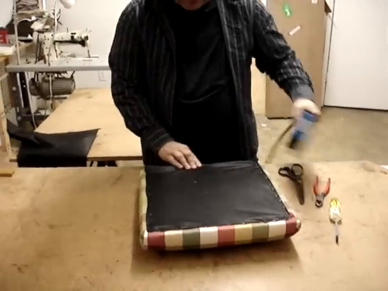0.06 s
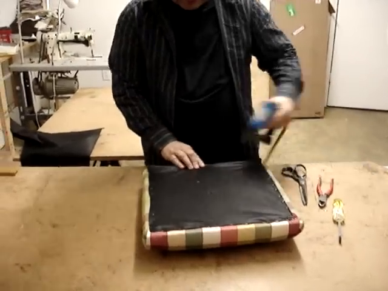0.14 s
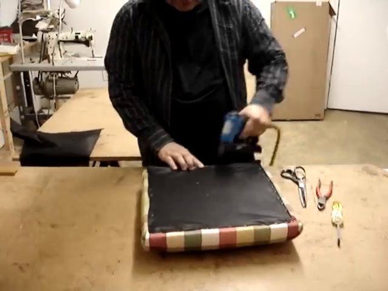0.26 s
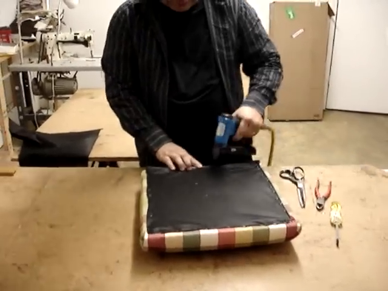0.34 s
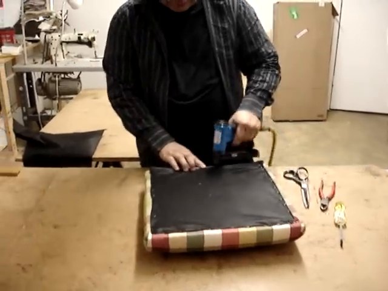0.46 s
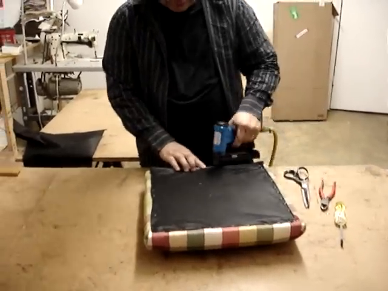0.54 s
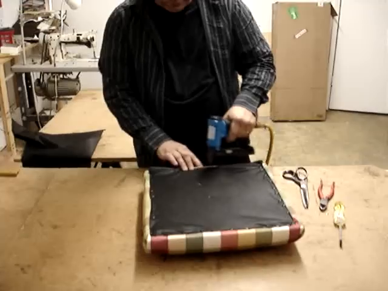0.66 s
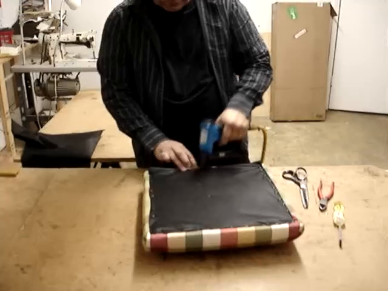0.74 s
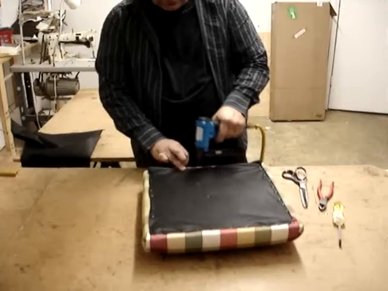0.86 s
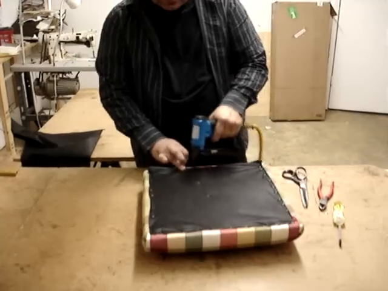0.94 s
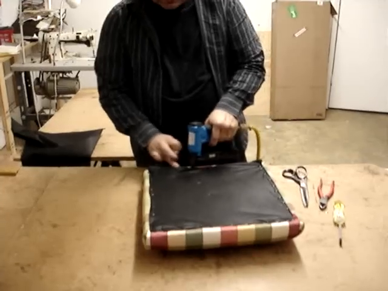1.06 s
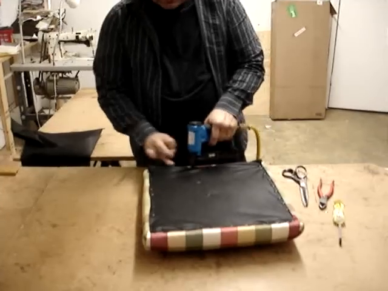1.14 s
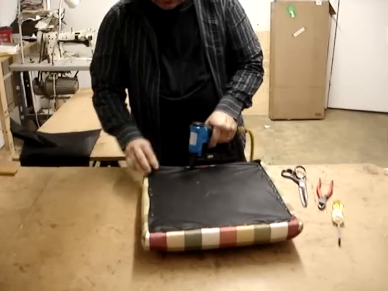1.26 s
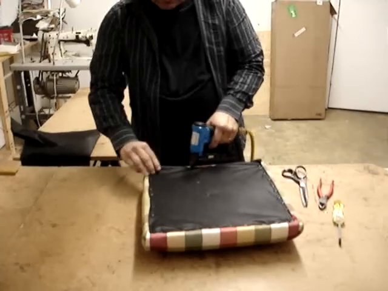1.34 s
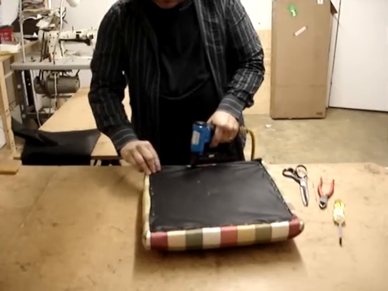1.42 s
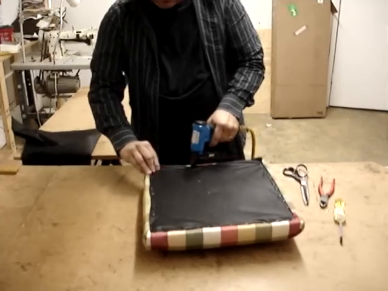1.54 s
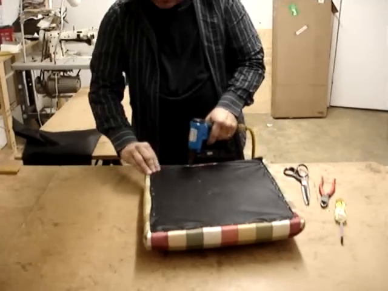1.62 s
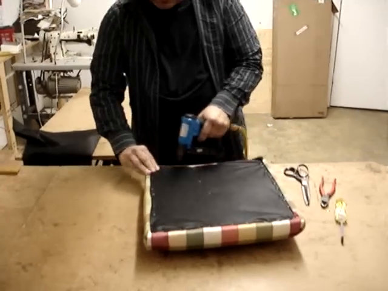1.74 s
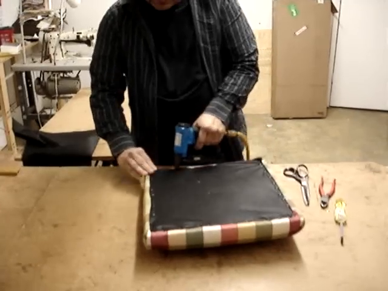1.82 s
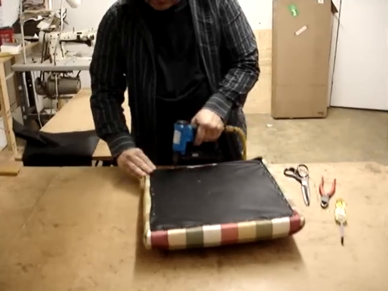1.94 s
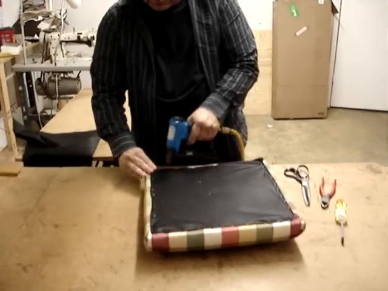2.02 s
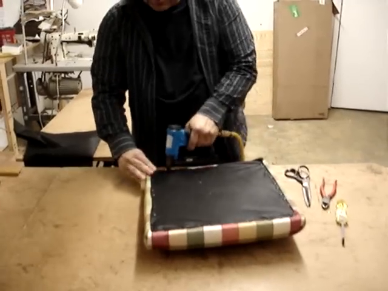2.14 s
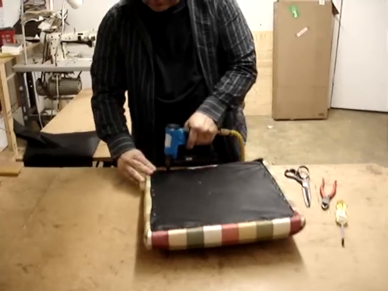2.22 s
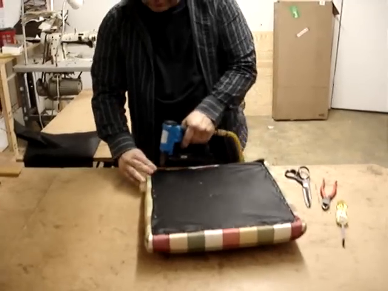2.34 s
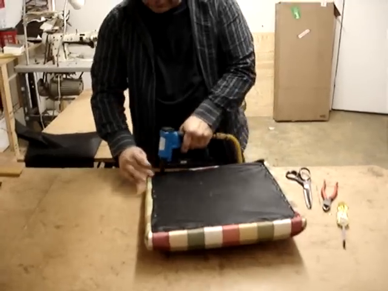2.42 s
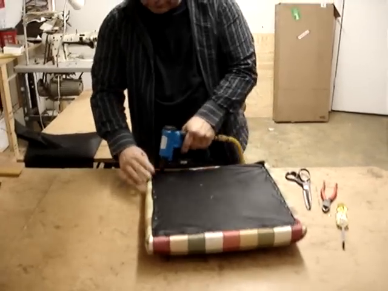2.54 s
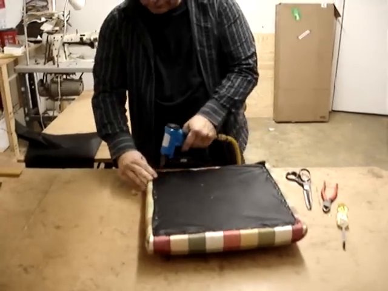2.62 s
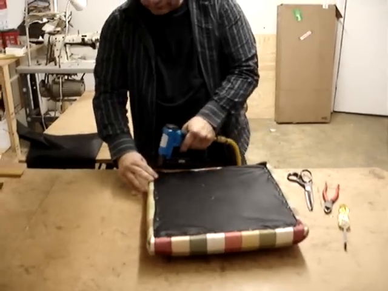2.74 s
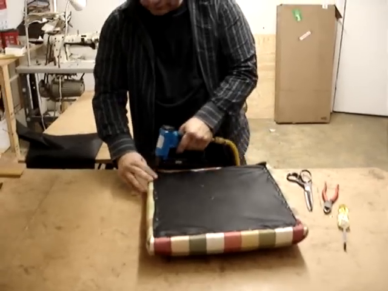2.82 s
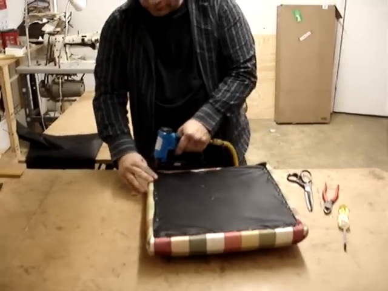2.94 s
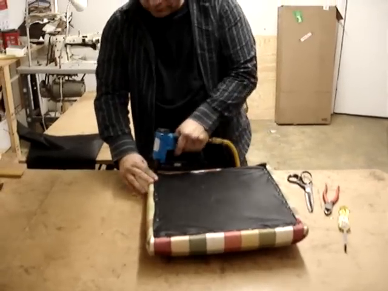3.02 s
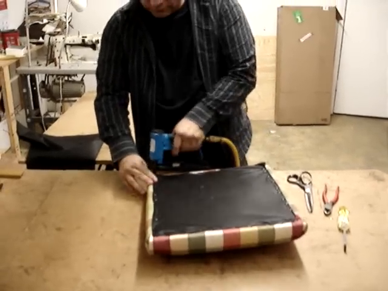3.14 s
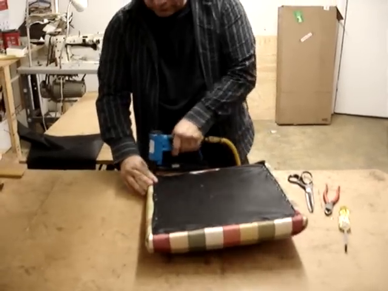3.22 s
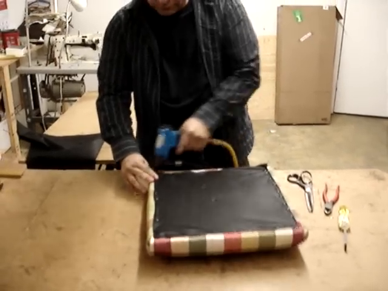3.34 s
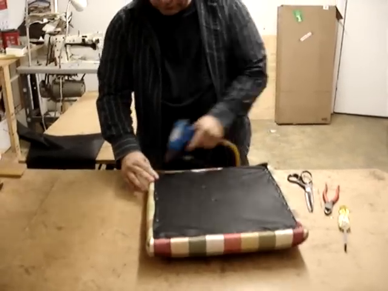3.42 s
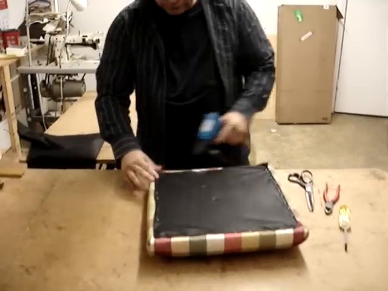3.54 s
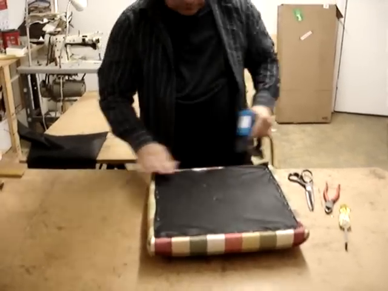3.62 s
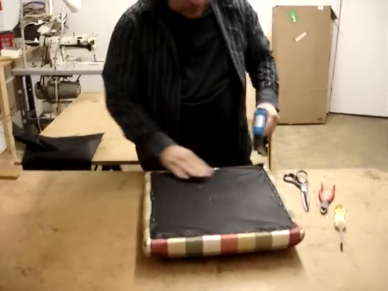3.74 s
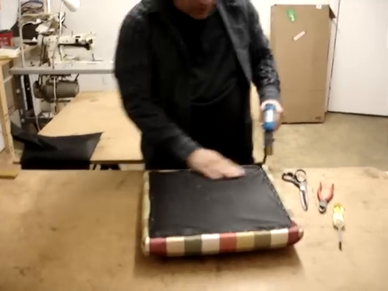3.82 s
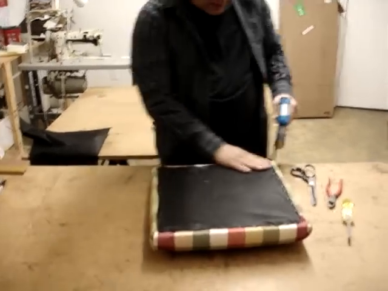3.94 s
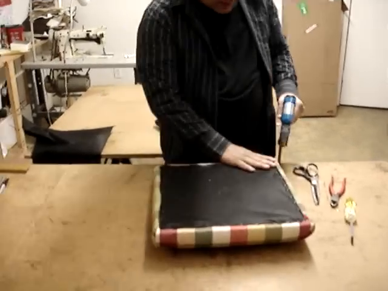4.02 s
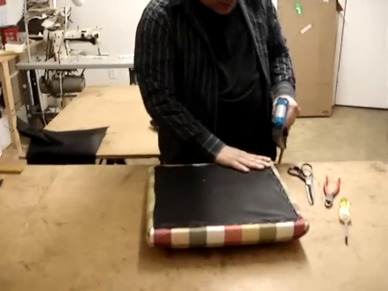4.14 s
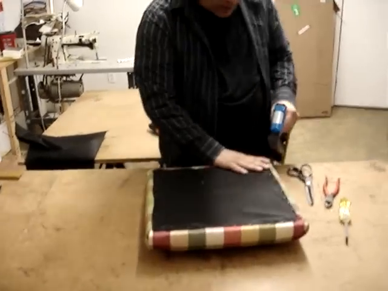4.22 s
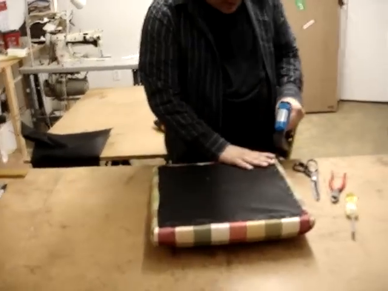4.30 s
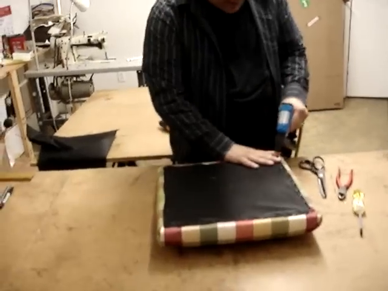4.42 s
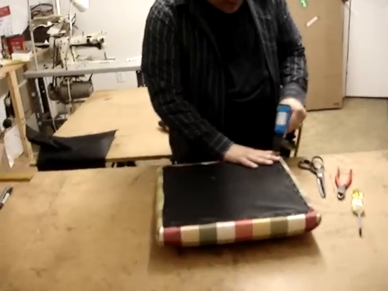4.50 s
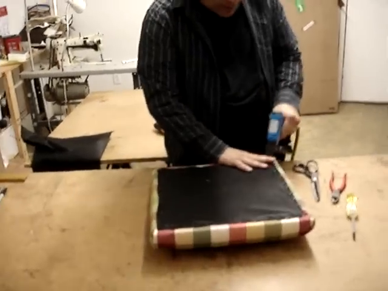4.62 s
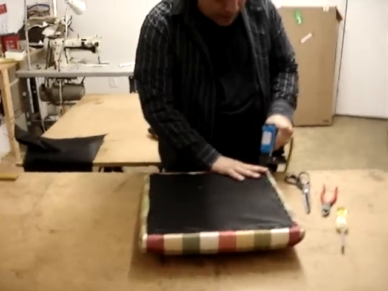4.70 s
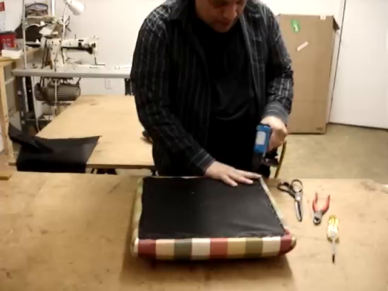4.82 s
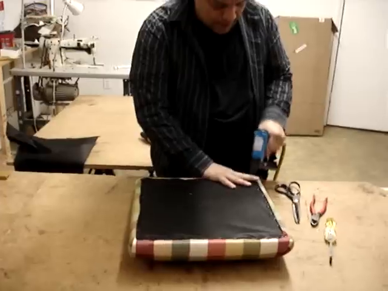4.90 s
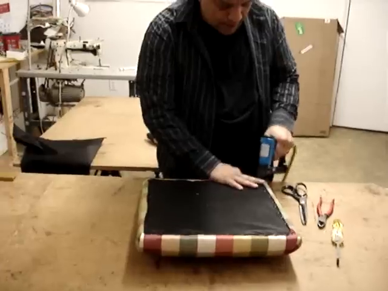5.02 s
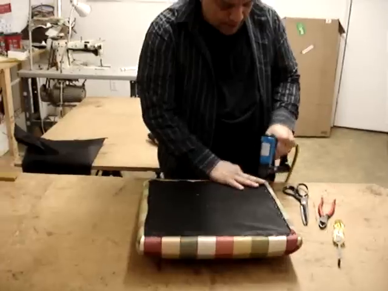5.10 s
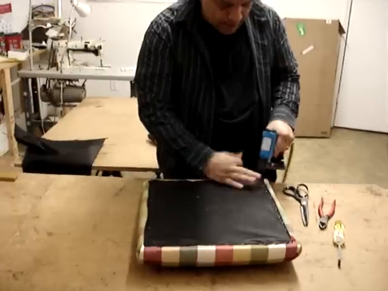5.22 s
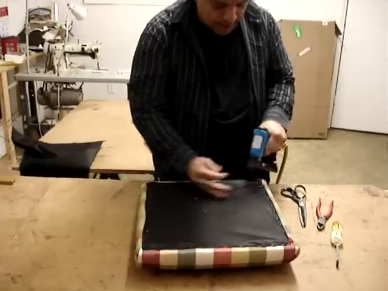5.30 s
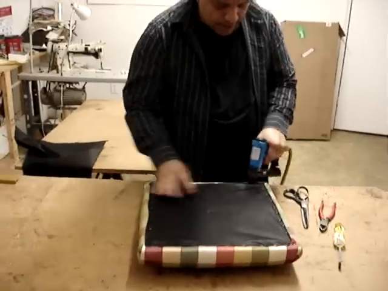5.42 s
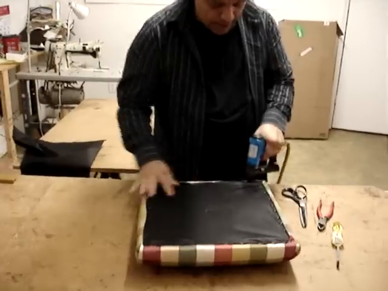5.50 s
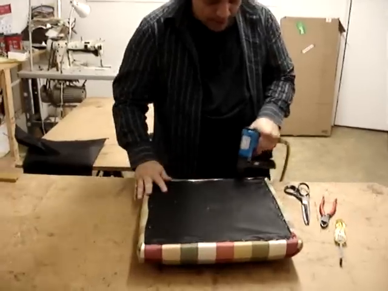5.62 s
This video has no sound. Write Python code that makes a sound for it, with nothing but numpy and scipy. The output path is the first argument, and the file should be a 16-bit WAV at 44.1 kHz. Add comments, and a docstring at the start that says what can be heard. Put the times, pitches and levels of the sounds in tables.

```python
"""Workshop bench: an air stapler tacks cloth to a wooden chair seat.
Per cycle the nose knocks on the frame, the piston fires the staple, the released trigger vents air.
A motor hums in the room; in a pause a palm smooths the cloth.
Gain control ducks at each shot and creeps back up; the peaks overload."""
import sys
import numpy as np
from scipy import signal
from scipy.fft import rfft, irfft, next_fast_len
from scipy.io import wavfile
from scipy.ndimage import uniform_filter1d

SR = 44100
rng = np.random.default_rng(int(sys.argv[2]) if len(sys.argv) > 2 else 0)


def inscribe(sig):
    """Save sig as 16-bit PCM at rate SR to the path in sys.argv[1].

    A 1-D sig is mono; a 2-D sig holds one channel per row.
    Samples are clipped to [-1, 1] before scaling.
    """
    pcm = np.round(np.clip(np.atleast_2d(sig).T, -1, 1) * 32767)
    wavfile.write(sys.argv[1], SR, pcm.astype(np.int16))


N = 249606
TIME_S = np.arange(N) / SR
EVENT_S = TIME_S[:32768]

# circuit noise: freq_hz, density_db
CIRCUIT_SPECTRUM = [(25, 0), (60, -8.5), (120, -9.5), (300, -21), (1000, -25), (9000, -27)]
# room decay: freq_hz, t60_s
ROOM_DECAY = [(100, 0.435), (300, 0.2016), (1000, 0.4317), (3000, 0.4056), (9000, 0.3416)]
# room colour: freq_hz, gain_db
ROOM_GAIN = [(100, -3.5), (170, -18.5), (300, 0.5), (1000, 2.5), (2500, 0), (5000, 4), (9000, -1.5)]
# motor hum: pitch_hz, rms_db
MOTOR_TONES = [(349.9, -51), (446.8, -53), (549.1, -55), (597.5, -61.5), (748.3, -56), (1319, -62.5),
               (1680, -65.5), (1943, -70.5), (2040, -65), (2283, -62.5), (2519, -64), (2762, -64.5)]
# motor air rush: freq_hz, density_db
RUSH_SPECTRUM = [(60, -8.5), (150, -7), (260, -5.5), (400, -4), (800, -8.5), (1300, -14.5), (2600, -17),
                 (5000, -21.5), (10000, -36)]
# palm on cloth: freq_hz, density_db
CLOTH_SPECTRUM = [(150, -14.5), (420, 6), (800, -1), (2000, -6), (5000, -2.5), (10000, -12.5)]
# palm strokes: start_s, length_s, level_db, cutoff_hz
PALM_STROKES = [(3.851, 0.416, -44.5, 9000), (4.22, 0.81, -42.5, 2800)]
# exhaust air: freq_hz, density_db
JET_SPECTRUM = [(41, -50.5), (70, -24.5), (165, -16), (228, -6.5), (305, -9), (491, -9.5), (556, -6.5),
                (643, -11), (914, -8), (1060, -11), (1250, -11.5), (2630, -6), (2920, -6.5), (4890, -9),
                (7720, -9), (9900, -12.5), (12900, -65), (21800, -120)]
# exhaust path resonances: pitch_hz, width_hz, gain_db
PORT_RESONANCES = [(120.3, 82, 4), (551, 32, 5)]
# trigger valve snapping back: pitch_hz, level_db, t60_s
VALVE_MODES = [(504, -16.5, 0.017), (1453, -9.5, 0.016), (1838, -7, 0.019), (2621, -12, 0.016)]
# trigger releases: start_s, air_db
RELEASES = [(0.7465, 5.5), (0.997, -1.5), (1.2742, -6.5), (2.098, -3.5), (2.356, -4.5), (2.627, -6.5),
            (3.3982, -3), (5.205, 3.5)]
# valve spit, rattle and steel crack: freq_hz, density_db
BURST_SPECTRUM = [(200, 0.5), (1500, -8.5), (3500, 3), (6000, 0.5), (10000, -8.5)]
# seat and bench: pitch_hz, level_db, t60_s
SEAT_MODES = [(251.8, -5, 0.119), (348.3, -21, 0.14), (442.2, -9.5, 0.0602), (613, -18.5, 0.046),
              (843, 0.5, 0.0225), (1253, 3, 0.0168), (1500, -2.5, 0.0074), (1954, 6.5, 0.00574),
              (2466, -7, 0.041), (5900, -7.5, 0.009)]
# nose set down on the seat: start_s, level_db, cutoff_hz
NOSE_KNOCKS = [(0.5936, 4.5, 2407), (0.8693, 11.5, 1980), (1.1161, 7.5, 2100), (1.9247, -10.5, 524),
               (2.2143, -2, 2300), (2.486, -4.5, 1210), (4.7902, -21.5, 704), (4.7942, -7, 1840),
               (5.0553, -5.5, 2440), (5.5276, 4.5, 1650)]
# gun and frame under the piston's blow: pitch_hz, level_db, t60_s
GUN_MODES = [(273.7, -38.5, 0.019), (367.4, -5, 0.01785), (812.5, -12, 0.0509), (1478, -13, 0.024),
             (1899, 0.5, 0.00572), (2308, -4.5, 0.01276), (2399.6, -28.5, 0.4735), (2657, -24, 0.35),
             (2671, -5, 0.00874), (3137, -6.5, 0.0142), (4389, -10.5, 0.015), (6860, -26, 0.0027)]
# staples fired: start_s, level_db
STAPLE_SHOTS = [(0.6294, 25.5), (0.9, 23), (1.1602, 22), (1.9677, 20.5), (2.2463, 18), (2.5297, 15),
                (3.3193, 18.5), (5.1062, 24.5), (5.567, 29.5)]


def from_db(db):
    """Decibels to gain."""
    return 10 ** (np.asarray(db) / 20)


def at_hz(points, hz):
    """Interpolate a table over log frequency."""
    known_hz, values = np.transpose(points)
    return np.interp(np.log(np.maximum(hz, 1)), np.log(known_hz), values)


def noise(spectrum, size=len(EVENT_S)):
    """Coloured noise, rms 1."""
    length = next_fast_len(size)
    gain = from_db(at_hz(spectrum, np.fft.rfftfreq(length, 1 / SR)))
    x = irfft(rfft(rng.standard_normal(length)) * gain, length)[:size]
    return x / x.std()


def cut(x, hz, kind, order=2):
    """Butterworth filter."""
    sos = signal.butter(order, np.clip(hz, 10, SR / 2 - 100), kind, fs=SR, output="sos")
    return signal.sosfilt(sos, x)


def steep_low_pass(x, hz):
    """Elliptic low-pass."""
    return signal.sosfilt(signal.ellip(12, .2, 80, hz, fs=SR, output="sos"), x)


def fade(t60_s, hold_s=0):
    """Exponential decay after an optional hold."""
    return np.exp(-np.log(1000) * np.maximum(EVENT_S - hold_s, 0) / t60_s) + 1e-18


def delayed(x, delay_s):
    """Fractional delay."""
    index = np.arange(len(x))
    return np.interp(index - delay_s * SR, index, x, left=0)


def add(track, start_s, sound):
    """Mix a sound into the track."""
    start = round(start_s * SR)
    track[..., start:start + sound.shape[-1]] += sound[..., :N - start]


def unit_peak(x):
    """Scale to peak 1."""
    return x / np.abs(x).max()


def with_send(x, send_db):
    """Two rows: direct sound, room send."""
    return np.array([x, from_db(send_db) * x])


def struck(modes, radiate_hz, spread_hz=1700, spread_q=0.957):
    """One blow, peak 1: modes vary with the spot struck; a small body radiates little bass."""
    spot = rng.normal(0, [1.2, .012], (len(modes), 2))
    rings = sum(from_db(db + offset_db) * fade(t60_s) * np.sin(2 * np.pi * hz * (1 + detune) * EVENT_S)
                for (hz, db, t60_s), (offset_db, detune) in zip(modes, spot))
    _, poles = signal.iirpeak(spread_hz, spread_q, fs=SR)
    dispersed = signal.lfilter(poles[::-1], poles, rings)   # all-pass: bending waves disperse
    return unit_peak(cut(dispersed, radiate_hz, "high", order=4))


def reverb(x, build_s=0.0041):
    """Diffuse room field: each third octave stores energy and lets it decay."""
    out, white = 0, rng.standard_normal((2, N))
    build = np.exp(-1 / (build_s * SR))
    for k, hz in enumerate(80 * 2 ** (np.arange(22) / 3)):
        edges_hz = hz * 2 ** (np.array([-1, 1]) / 6)
        retain = np.exp(-2 * np.log(1000) / (at_hz(ROOM_DECAY, hz) * SR))
        power = cut(x + 1e-12, edges_hz, "band") ** 2 + 1e-18
        arriving = signal.lfilter([1 - build], [1, -build], power)
        stored = signal.lfilter([1 - retain], [1, -retain], arriving)
        field = cut(white[k % 2], edges_hz, "band")
        out = out + from_db(at_hz(ROOM_GAIN, hz)) * np.sqrt(stored) * field / field.std()
    return out


def motor(rush_db=-46.5):
    """Steady tones over a soft rush of air."""
    tones = sum(from_db(db) * np.sqrt(2) * np.sin(2 * np.pi * (hz * TIME_S + rng.random()))
                for hz, db in MOTOR_TONES)
    return tones + from_db(rush_db) * noise(RUSH_SPECTRUM, N)


def palm_strokes():
    """A palm slides over cloth; the level follows its speed."""
    out = np.zeros(N)
    for start_s, length_s, level_db, cutoff_hz in PALM_STROKES:
        speed = np.sin(np.pi * np.clip((TIME_S - start_s) / length_s, 0, 1))
        out += from_db(level_db) * speed * cut(noise(CLOTH_SPECTRUM, N), cutoff_hz, "low", order=1)
    return out


def vents(lag_s=0.00272, open_s=0.00058, puff_s=0.0191, halving_db=18.5, jet_db=-1, click_db=7.5):
    """The valve clicks back; the cylinder empties through the exhaust port, pressure sagging."""
    out = np.zeros((2, N))
    opening = 1 - np.exp(-(EVENT_S / open_s) ** 2)
    sag = fade(t60_s=1.0)
    for start_s, air_db in RELEASES:
        length_s = puff_s * 2 ** (-air_db / halving_db)   # wider valve: louder, shorter
        emptying = fade(t60_s=0.0647, hold_s=length_s)
        jet = noise(JET_SPECTRUM) * delayed(opening * sag * emptying, lag_s)
        hollow = sum(from_db(db) * signal.lfilter(*signal.iirpeak(hz, hz / width_hz, fs=SR), jet)
                     for hz, width_hz, db in PORT_RESONANCES)
        puff = from_db(air_db + jet_db) * (jet + hollow)
        click = from_db(click_db + 0.8 * air_db) * struck(VALVE_MODES, radiate_hz=300)
        add(out, start_s, with_send(puff + click, send_db=-2))
    return out


def knocks(rattle_db=-23.5):
    """The nose lands on the padded frame; loose gun parts rattle."""
    out = np.zeros((2, N))
    for start_s, level_db, cutoff_hz in NOSE_KNOCKS:
        rattle = from_db(rattle_db) * noise(BURST_SPECTRUM) * fade(t60_s=0.081)
        wood = struck(SEAT_MODES, radiate_hz=188.2, spread_hz=1226, spread_q=2.4)
        thud = unit_peak(cut(wood, cutoff_hz, "low"))
        add(out, start_s, with_send(from_db(level_db) * (thud + rattle), send_db=-5))
    return out


def valve_spits(lead_s=0.0053, spit_db=-24):
    """Air swells into the cylinder just before each blow."""
    out = np.zeros(N)
    swell = np.linspace(0, 1, round(lead_s * SR))
    for start_s, level_db in STAPLE_SHOTS:
        air = noise(BURST_SPECTRUM)[:len(swell)]
        add(out, start_s - lead_s, from_db(level_db + spit_db) * swell * air)
    return out


def recoils(push_db=-25):
    """Each blow shoves the seat against the bench: one dull pressure pulse."""
    out = np.zeros(N)
    push = cut(fade(t60_s=0.064), 105, "low", order=3)
    for start_s, level_db in STAPLE_SHOTS:
        add(out, start_s, from_db(level_db + push_db) * push)
    return cut(out, 36, "high")


def shots(cushion_hz=3200, seating_s=0.0033, seating_db=-2, crack_db=-13, echo_s=0.0137, echo_db=-7):
    """The driver pushes the staple in, then bottoms out; the ceiling reflects the treble."""
    out = np.zeros((2, N))
    for start_s, level_db in STAPLE_SHOTS:
        drive = unit_peak(cut(struck(GUN_MODES, radiate_hz=228), cushion_hz, "low"))
        seating = from_db(seating_db) * delayed(struck(GUN_MODES, radiate_hz=1200), seating_s)
        crack = from_db(crack_db) * noise(BURST_SPECTRUM) * fade(t60_s=0.01327)
        blow = drive + seating + crack
        echo = from_db(echo_db) * delayed(cut(blow, 1200, "high", order=1), echo_s)
        add(out, start_s, with_send(from_db(level_db) * (blow + echo), send_db=-6))
    return out


def scene():
    """All sources and the room, mono."""
    direct, send = knocks() + shots() + vents()
    return (direct + reverb(send) + valve_spits() + recoils() + motor() + palm_strokes())[None]


def peak_hold(excess_db, db_per_s):
    """Each maximum sinks at a steady rate."""
    return np.maximum.accumulate(excess_db + db_per_s * TIME_S) - db_per_s * TIME_S


def gain_control(x, limit_db=-12, hold_db=17):
    """Limiter: fast release at first, then a creep over seconds."""
    power = uniform_filter1d(x ** 2, size=150)
    level_db = 10 * np.log10(np.maximum(power, 1e-12))
    excess_db = np.maximum(level_db - limit_db, 0)
    fast_db = peak_hold(excess_db, db_per_s=65)
    slow_db = peak_hold(np.minimum(excess_db, hold_db), db_per_s=3.0)
    duck_db = uniform_filter1d(np.maximum(fast_db, slow_db), size=40)
    return x * from_db(-duck_db)


def record(dry, noise_db=-58.5, mains_db=-66.5, mains_hz=59.46):
    """Gain control, asymmetric overload, circuit noise, mains hum, band limit, peak clipping."""
    x = gain_control(dry[0])
    rail = np.where(x > 0, 0.821, 1.0)
    x = rail * np.tanh(x / rail)
    x += from_db(noise_db) * noise(CIRCUIT_SPECTRUM, N)
    x += from_db(mains_db) * np.sqrt(2) * np.sin(2 * np.pi * mains_hz * TIME_S)
    x = np.clip(steep_low_pass(x, hz=10000), -.7, .7)
    return steep_low_pass(x, hz=15800)[None]


dry = scene()
out = record(dry)
inscribe(out)
```